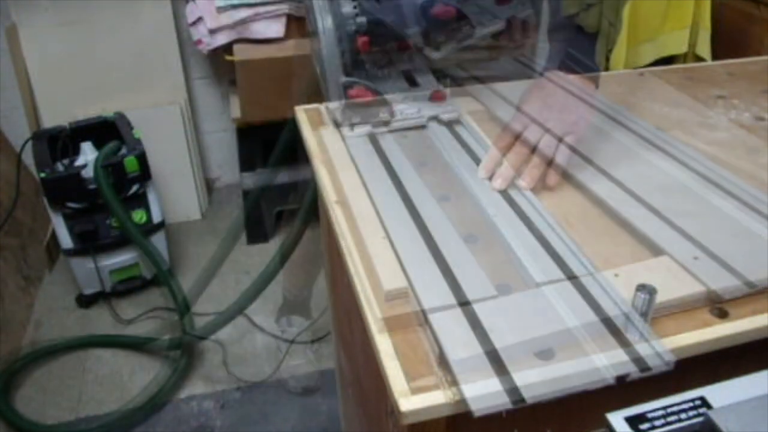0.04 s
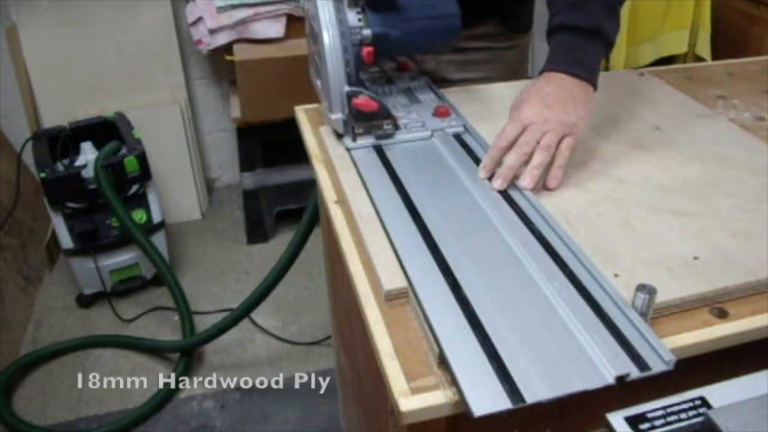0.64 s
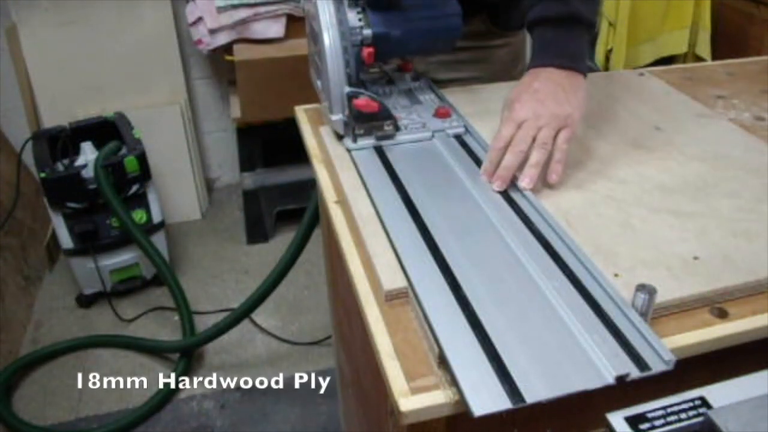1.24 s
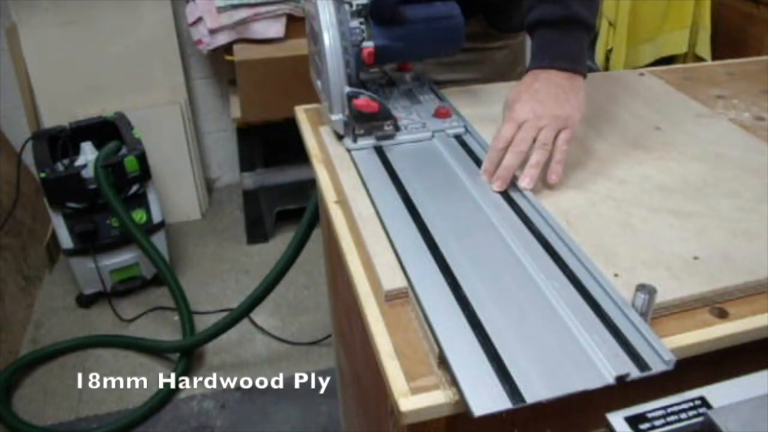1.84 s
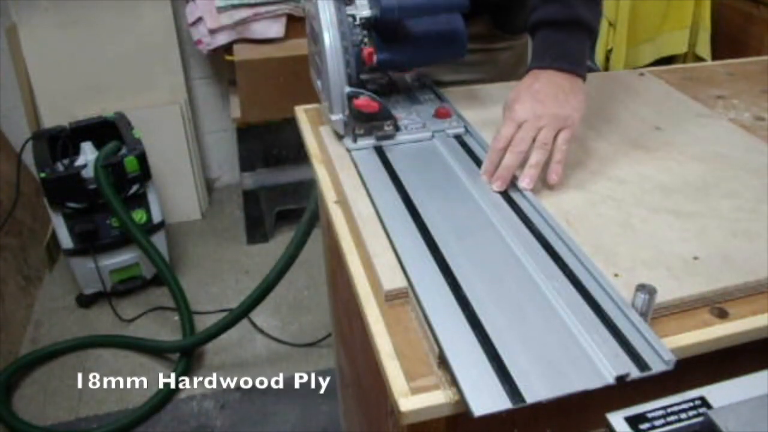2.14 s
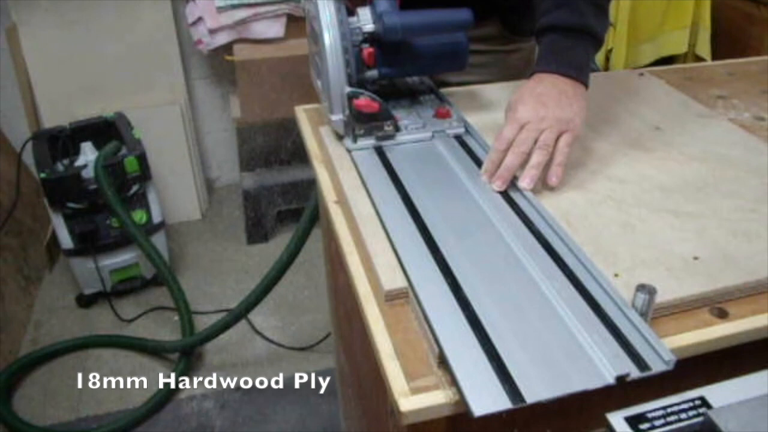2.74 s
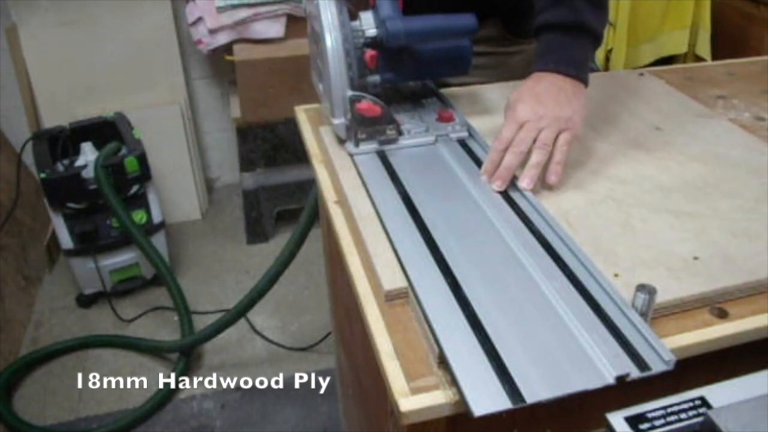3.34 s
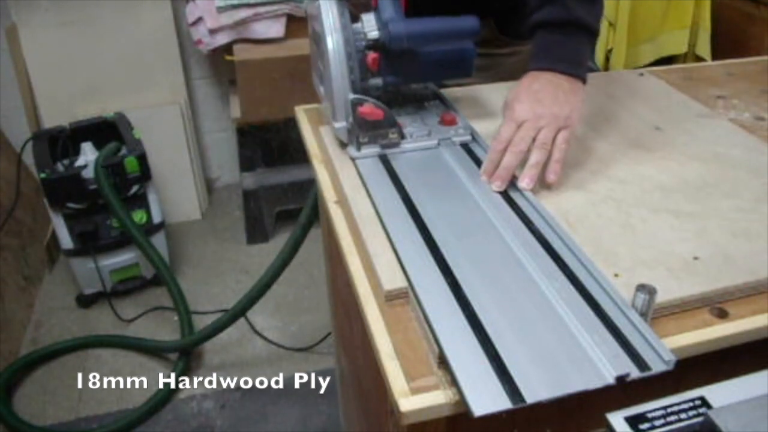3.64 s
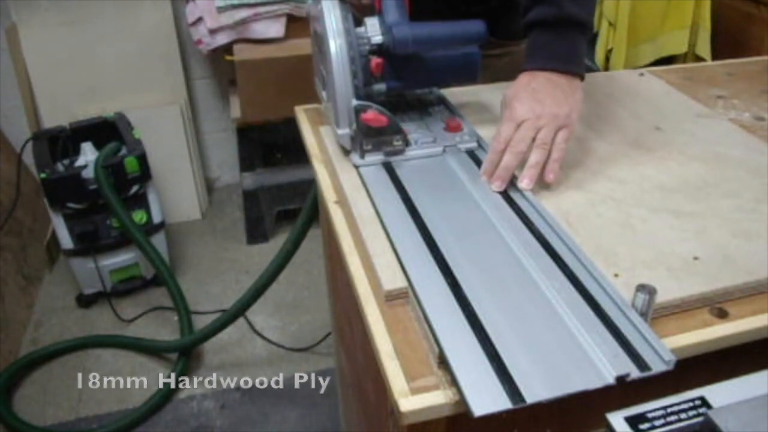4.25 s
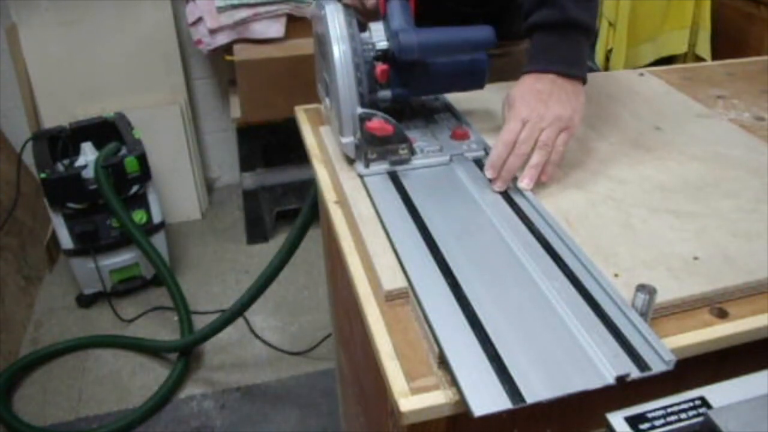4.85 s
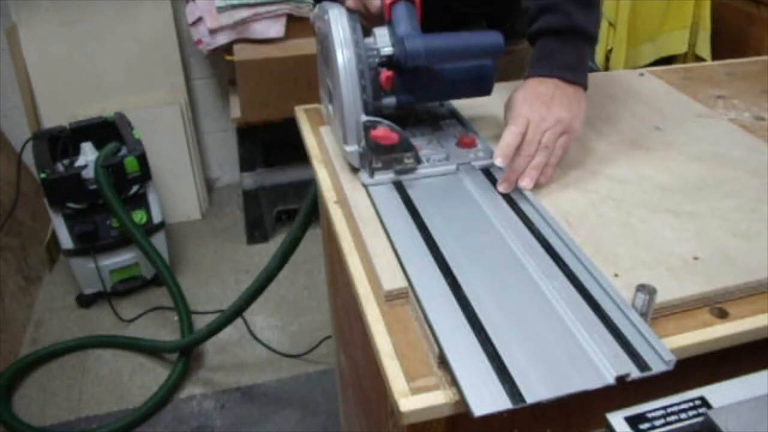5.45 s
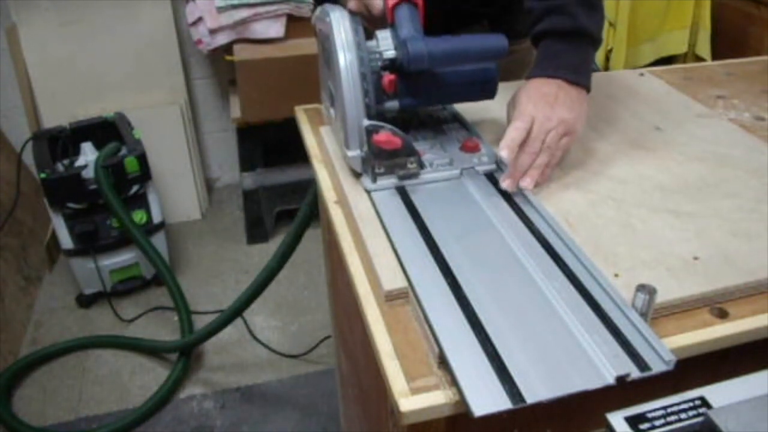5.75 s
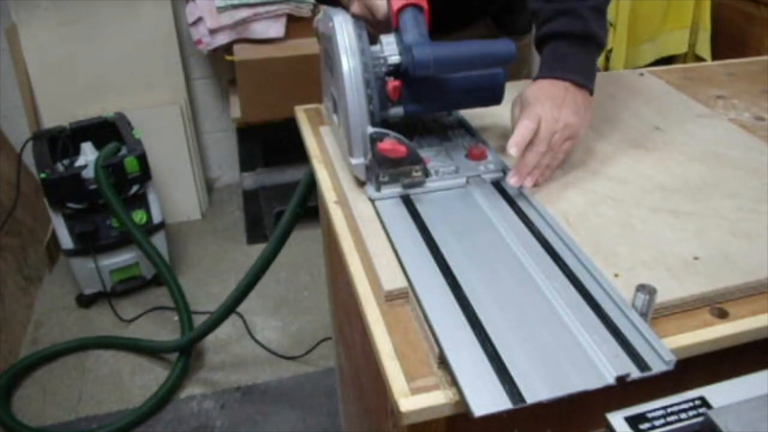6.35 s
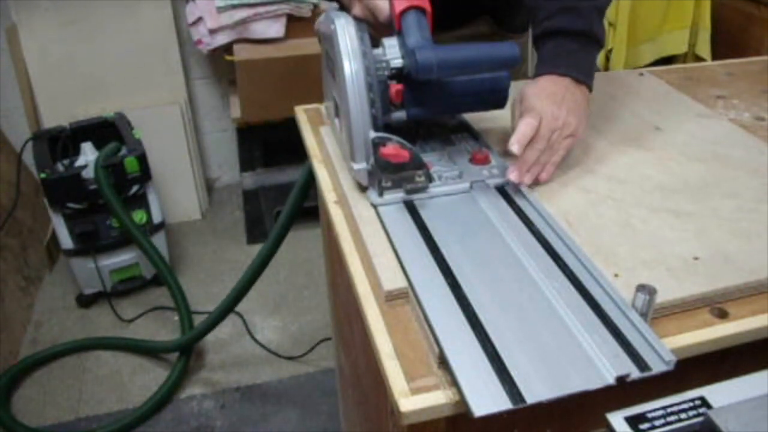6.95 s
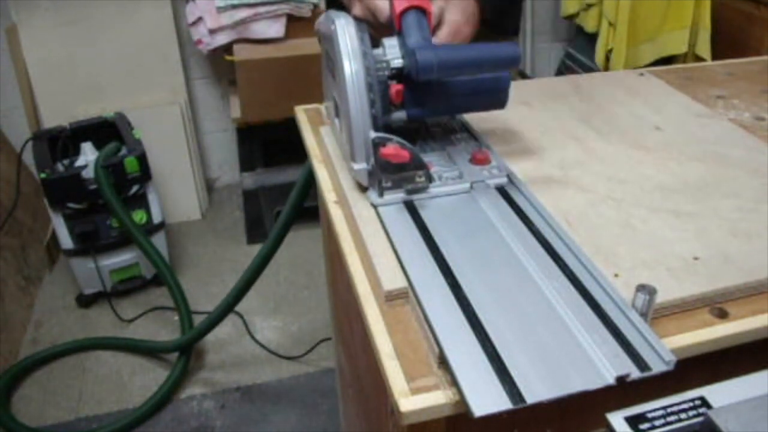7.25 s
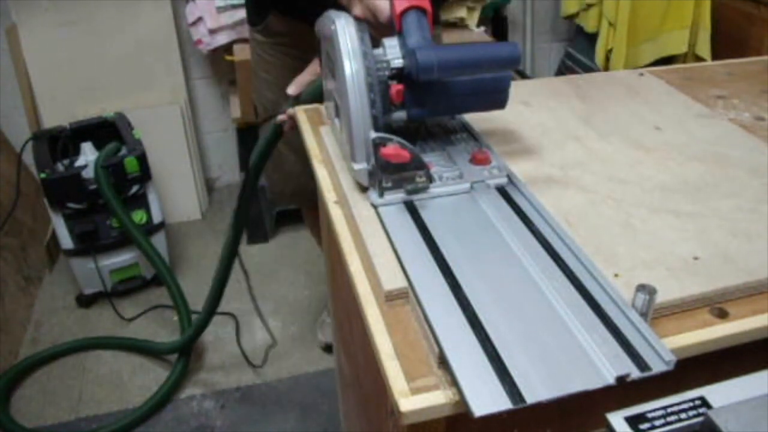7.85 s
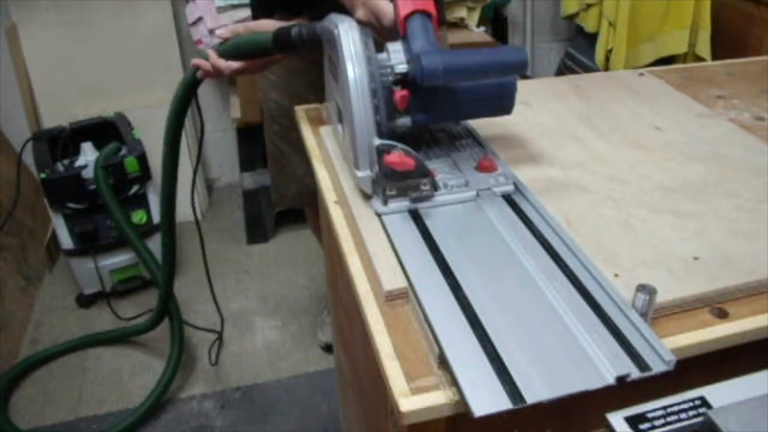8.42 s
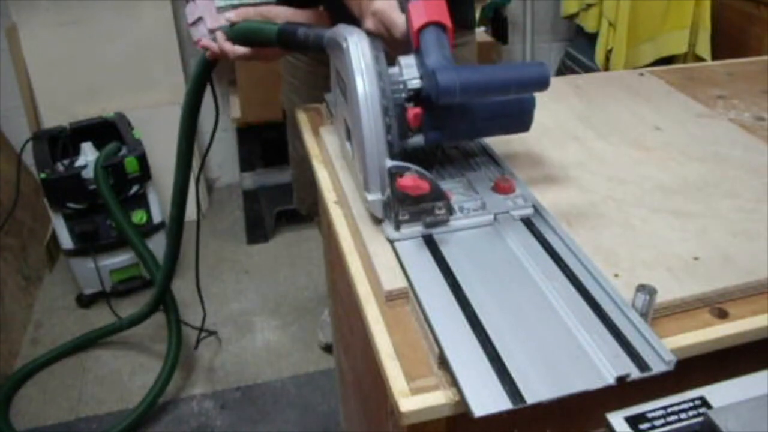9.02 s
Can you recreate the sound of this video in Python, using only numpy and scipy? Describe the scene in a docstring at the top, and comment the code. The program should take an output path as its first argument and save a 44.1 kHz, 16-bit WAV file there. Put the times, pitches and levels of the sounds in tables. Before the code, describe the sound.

A few light knocks, then a plunge saw starts and cuts plywood with a whine and brief squeals over a rushing dust extractor.

```python
"""A plunge saw cuts plywood in a workshop. Its teeth keep the blade ringing; now and then the blade
rubs in the kerf and squeals. The motor starts with a kick, runs up, and its whine sags under load.
Before the start, the saw knocks and slides lightly on its guide rail. A dust extractor rushes under
the cut. The machines overload a narrow-band recorder, which flattens them to one steady level."""
import sys
import numpy as np
from scipy import signal
from scipy.fft import rfft, irfft, next_fast_len
from scipy.io import wavfile
from scipy.ndimage import uniform_filter1d

SR = 44100
rng = np.random.default_rng(int(sys.argv[2]) if len(sys.argv) > 2 else 0)


def log_audio(samples):
    """Write samples as a 16-bit WAV file to the path given in sys.argv[1]."""
    # one column per channel
    frames = np.atleast_2d(samples).T
    # limit to full scale, then quantise
    limited = np.clip(frames, -1, 1)
    pcm = np.round(limited * 32767).astype(np.int16)
    wavfile.write(sys.argv[1], SR, pcm)


N = 400428
T = np.arange(N) / SR
START_S, RATED_HZ = 1.698, 460  # switch-on time, rated shaft speed

# Blade modes. Each row: pitch at rated speed in Hz, width in Hz, relative level in the cut in dB,
# shift in Hz per Hz of shaft speed, change when spinning free in dB.
BLADE_MODES = [(2968, 35, -44, -0.6, -16), (3432, 21.5, -44, 0.7, -2), (4616, 29, -44.5, 0.9, -8),
               (4665, 36, -44.5, 0.9, -7)]
# Saw body and rail under the cut. Each row: centre in Hz, width in Hz, relative level in dB.
BODY_MODES = [(980, 125, -53.5), (1888, 98, -47.5), (2059, 62, -51), (2700, 104, -47.5), (2888, 210, -47.5),
              (4070, 47, -57)]
# Rubs in the kerf. Each row: middle in seconds, length in seconds, pitch in Hz, relative level in dB.
KERF_RUBS = [(2.36, 0.17, 3434, -34), (2.847, .26, 4655, -34), (3.135, .22, 2965, -37.5),
             (3.7, 0.22, 3435, -35.5), (4.305, .2, 4634, -38), (5.65, 0.19, 2980, -38),
             (5.845, 0.12, 4620, -34), (6.803, 0.16, 2966, -34), (7.485, 0.11, 2968, -42),
             (7.715, 0.51, 4680, -34.5), (8.035, 0.22, 2966, -38), (8.25, 0.22, 4665, -39.5),
             (8.475, 0.24, 3467, -34.5), (8.704, 0.1, 3432, -31.5)]
# Speed the motor settles to as the feed varies. Each row: time in seconds, shaft speed in Hz.
SETTLED_SPEED = [(2.5, 473), (2.75, 462), (3.4, 464), (4.15, 458), (4.8, 447), (5.9, 441), (6.8, 461),
                 (7.05, 463), (7.35, 484), (7.9, 492), (8.4, 472), (8.65, 442), (8.9, 420), (9.08, 415)]
# Run-up, first touch, steady cut, hard push. Each row: time in seconds, load (0 free, 1 full cut).
MOTOR_LOAD = [(1.95, 0.85), (2.08, 0.16), (2.5, 0.022), (2.75, 0.36), (2.88, 1), (3.0, 0.25), (3.15, 0.93),
              (8.25, 1), (8.55, 2.04), (9.08, 1.7)]
# Multiples of the shaft speed: shaft hum, fan, fan octave, gear, gear half tone.
SHAFT_ORDERS = [2, 4, 8, 35 / 3, 35 / 6]
# Motor tones, one per order. Each row: relative level in dB, shaft speed where loudest in Hz,
# speed range in Hz, change per unit load in dB.
MOTOR_TONES = [(-55.5, 496, 12, 5.5), (-42.5, 449.4, 17, -10), (-35.5, 472, 13, -15),
               (-44.5, 300, 120, 2.5), (-56.5, 422, 40, 7)]
# Fan whine swells. Each row: middle in seconds, length in seconds, shaft order, rise in dB.
FAN_SWELLS = [(1.97, 0.29, 8, 14), (2.198, 0.17, 4, 8), (2.47, 0.14, 8, 5.5), (2.56, 0.13, 4, 5),
              (3.012, .12, 8, 5)]
# Housing resonances. Each row: centre in Hz, width in Hz, relative level in dB.
HOUSING_MODES = [(315, 29, -8), (701, 225, 0), (1024, 210, -3), (1520, 57, -1.5), (1918, 99, 1),
                 (2555, 1350, 3)]
# Knocks of saw on rail. Each row: start in seconds, relative level in dB, low-pass cutoff in Hz.
RAIL_KNOCKS = [(0.021, -48, 4000), (0.046, -63, 3500), (0.0976, -52, 3600), (0.147, -65, 3000),
               (0.234, -43.5, 1700), (0.287, -45, 2520), (0.298, -37, 2400), (0.388, -49, 3500),
               (0.419, -54, 1600), (0.462, -50, 3000), (0.478, -49, 1500), (0.536, -52.5, 2600),
               (0.581, -56.5, 1300), (0.898, -50.5, 990), (1.393, -68.5, 2000), (1.501, -70, 2000),
               (1.676, -65, 1790)]
# Rail on the bench. Each row: pitch in Hz, t60 in seconds, relative level in dB.
RAIL_MODES = [(589, 0.15, -6), (805, .07, -4.5), (943, 0.13, -8), (1190, 0.17, -12), (1520, 0.067, -7),
              (1745, 0.055, -1), (2045, 0.032, 1), (2580, 0.032, 0), (3910, 0.017, 6)]
# Pushes along the rail. Each row: start in seconds, hold in seconds, relative level in dB,
# fade t60 in seconds, hiss against scrape in dB.
BASE_PUSHES = [(0, 0.047, -62.5, 0.66, 6), (.1, 0.4, -72.5, 1.0, 0.5), (1.45, 0.054, -68, 0.23, -16)]
# Noise spectra. Each row: frequency in Hz, relative density in dB.
RUSH_SPECTRUM = [(20, -9.5), (100, -6.5), (450, -6.5), (750, -3), (1000, -3.5), (1500, -3), (2300, -1.5),
                 (2750, 2.5), (3500, 2.5), (4300, -1), (4900, 1), (6000, -6)]  # air and cutting teeth
CRACK_SPECTRUM = [(60, -26), (200, -9), (440, -5), (600, 4), (1000, 1), (2000, -1), (3000, -4), (5000, -7)]  # crack of a knock
SCRAPE_SPECTRUM = [(10, -15), (30, 1), (150, -6), (400, -4.5), (700, -2), (2200, -2), (3000, -16),
                   (5000, -13)]  # dull scrape of the base
HISS_SPECTRUM = [(20, 0), (80, 12.5), (250, -3), (1200, -9), (2300, 0), (5000, -4)]  # dry hiss of the base
ROOM_SPECTRUM = [(10, -25), (20, 0), (30, -8), (70, -20), (150, -17), (400, -22.5), (700, -22),
                 (1200, -23.5), (3400, -26.5), (5000, -28)]  # quiet workshop
# Recorder response before and after the overload. Each row: frequency in Hz, gain in dB.
INPUT_RESPONSE = [(20, 3.5), (4850, 0.5), (5050, -3), (5200, -12), (5400, -14), (5900, -60)]
OUTPUT_RESPONSE = [(20, 1), (4900, 0), (5400, -6), (7000, -6), (10500, -6.5), (13000, -9.5), (15700, -20)]


def blade(speed_hz, load, wander_db=1.2, body_db=-1, body_free_db=-5):
    """Teeth striking wood keep the blade's modes ringing; body and rail resonate more under load."""
    free = np.clip(1 - load, 0, 1)
    ring = 0
    for hz, width_hz, db, shift, free_db in BLADE_MODES:
        mode_hz = hz + shift * (speed_hz - RATED_HZ)  # waves with the spin rise, those against it fall
        ring += undb(db + free_db * free + wander_db * walk(5)) * resonance(mode_hz, width_hz)
    body = undb(body_db + body_free_db * free) * resonances(BODY_MODES)
    return np.minimum(speed_hz / RATED_HZ, 1) ** 6 * (ring + body)


def squeals(waver_hz=12):
    """Each rub in the kerf swells one blade mode into a nearly pure tone."""
    out = np.zeros(N)
    waver_cycles = np.cumsum(waver_hz * walk(60)) / SR
    for middle_s, length_s, hz, db in KERF_RUBS:
        out += undb(db) * arch(middle_s, length_s) * np.sin(2 * np.pi * (hz * T + waver_cycles))
    return out


def shaft_speed_hz(start_deficit=0.82, runup_s=0.152):
    """The motor closes in on its running speed, which sags and recovers with the feed."""
    runup = 1 - start_deficit * np.exp(-since(START_S) / runup_s)
    return np.interp(T, *np.transpose(SETTLED_SPEED)) * runup


def motor(speed_hz, load, wobble=0.002, load_wobble=0.0012, flutter_db=3):
    """Hum, fan and gear tones on one trembling shaft; load damps the fan and makes the gears sing."""
    tremble = (wobble + load_wobble * load) * walk(90)
    angle = 2 * np.pi * np.cumsum(speed_hz * (1 + tremble)) / SR
    tones = 0
    for order, (db, loudest_hz, range_hz, load_db) in zip(SHAFT_ORDERS, MOTOR_TONES):
        in_tune = 1 / np.hypot(1, (speed_hz - loudest_hz) / range_hz)
        swell_db = sum(rise_db * arch(middle_s, length_s)
                       for middle_s, length_s, fan_order, rise_db in FAN_SWELLS if fan_order == order)
        level_db = db + load_db * load + swell_db + flutter_db * walk(45)
        tones += in_tune * undb(level_db) * np.sin(order * angle)
    return room_echo(tones)


def starting_kick(level_db=-37.5, t60_s=2.6):
    """Starting torque shakes the housing into a fading rattle."""
    return unit(resonances(HOUSING_MODES)) * undb(level_db - 60 * since(START_S) / t60_s)


def extractor(level_db=-32, start_offset_db=-10, build_s=0.32, flicker_db=0.73):
    """Air and flying chips: a broad, slightly flickering rush that builds up and holds."""
    build_db = start_offset_db * np.exp(-since(START_S) / build_s)
    return undb(level_db + build_db + flicker_db * walk(20)) * noise(RUSH_SPECTRUM)


def knocks(crack_t60_s=0.026, ring_db=-7, tail_db=-14, tail_t60_s=0.27, contact_s=0.00065):
    """Saw meets rail: a short crack, the rail's modes and a room tail; softer contacts are duller."""
    out, grit = np.zeros(N), noise(CRACK_SPECTRUM)
    t = T[:SR // 2]
    attack = np.minimum(t / contact_s, 1)
    for start_s, db, cutoff_hz in RAIL_KNOCKS:
        start = int(start_s * SR)
        span = slice(start, start + len(t))
        weights = rng.uniform(0.6, 1.4, len(RAIL_MODES))  # vary with the contact point
        phases = rng.uniform(0, 2 * np.pi, len(RAIL_MODES))
        ring = sum(weight * undb(mode_db - 60 * t / t60_s) * np.sin(2 * np.pi * hz * t + phase)
                   for weight, phase, (hz, t60_s, mode_db) in zip(weights, phases, RAIL_MODES))
        burst = grit[span] * (undb(-60 * t / crack_t60_s) + undb(tail_db - 60 * t / tail_t60_s))
        lowpass = signal.butter(2, cutoff_hz, fs=SR)
        out[span] += undb(db) * signal.lfilter(*lowpass, (burst + undb(ring_db) * ring) * attack)
    return out


def sliding(catch_db=2.5, attack_s=0.0049):
    """The base rubs unevenly along the rail: each push sets in quickly, holds and fades."""
    out, scrape, hiss = np.zeros(N), noise(SCRAPE_SPECTRUM), noise(HISS_SPECTRUM)
    for start_s, hold_s, db, t60_s, hiss_db in BASE_PUSHES:
        attack = np.minimum(since(start_s) / attack_s, 1)
        push = attack * undb(db - 60 * since(start_s + hold_s) / t60_s)
        out += push * (scrape + undb(hiss_db) * hiss)
    return undb(catch_db * walk(70)) * out


def room_echo(x, wet_db=-5.5, t60_s=0.12, gap_s=0.004):
    """Direct sound plus the dense, short echo of a small room."""
    t = T[:SR // 3]
    echo = rng.standard_normal(len(t)) * undb(-60 * t / t60_s) * (t > gap_s)
    return x + undb(wet_db) * signal.fftconvolve(x, echo / np.linalg.norm(echo))[:N]


def undb(db):
    """Decibels to gain."""
    return 10 ** (db / 20)


def unit(x):
    """Scale to rms 1."""
    return x / np.sqrt(np.mean(x ** 2))


def since(start_s):
    """Seconds since start_s, 0 before it."""
    return np.maximum(T - start_s, 0)


def arch(middle_s, length_s):
    """Half-cosine rise and fall, 0 to 1 to 0."""
    return np.cos(np.pi * np.clip((T - middle_s) / length_s, -0.5, 0.5))


def walk(rate_hz):
    """Smooth random drift, rms 1."""
    hold = int(SR / rate_hz)
    steps = np.repeat(rng.standard_normal(N // hold + 1), hold)
    return unit(uniform_filter1d(uniform_filter1d(steps, hold), hold)[:N])


def colour(x, points):
    """Filter by a curve of (Hz, dB) points."""
    hz, db = np.transpose(points)
    size = next_fast_len(len(x) + 4096)
    bins_hz = np.maximum(np.fft.rfftfreq(size, 1 / SR), 1)
    gain = undb(np.interp(np.log(bins_hz), np.log(hz), db))
    return irfft(rfft(x, size) * gain, size)[:len(x)]


def noise(spectrum):
    """Coloured noise, rms 1."""
    return unit(colour(rng.standard_normal(N), spectrum))


def resonance(hz, width_hz):
    """Noise-driven resonance with steep skirts, rms 1; its centre may move."""
    drive = rng.standard_normal(N) + 1j * rng.standard_normal(N)
    envelope = signal.sosfilt(signal.butter(2, width_hz / 2, fs=SR, output="sos"), drive)
    carrier = np.exp(2j * np.pi * np.cumsum(hz * np.ones(N)) / SR)
    return unit(np.real(envelope * carrier))


def resonances(modes):
    """Sum of steady noise-driven resonances."""
    return sum(undb(db) * resonance(hz, width_hz) for hz, width_hz, db in modes)


def scene(machines_db=3.0, rise_s=0.0093, room_db=-76.5):
    """Handling in the quiet room, then saw and extractor switch on."""
    speed_hz = shaft_speed_hz()
    load = np.interp(T, *np.transpose(MOTOR_LOAD))
    running = np.minimum(since(START_S) / rise_s, 1)
    machines = motor(speed_hz, load) + blade(speed_hz, load) + squeals() + extractor() + starting_kick()
    machines *= undb(machines_db) * running
    return (machines + knocks() + sliding() + undb(room_db) * noise(ROOM_SPECTRUM))[None]


def record(dry, ceiling_db=-32, knee_hardness=12, mirror_db=-19, top_hz=15700):
    """A 5 kHz pass band, then an overloaded stage whose distortion fills the treble."""
    band = colour(dry[0], INPUT_RESPONSE)
    drive = np.abs(band / undb(ceiling_db))
    clipped = band / (1 + drive ** knee_hardness) ** (1 / knee_hardness)
    # overload adds faint mirror tones around SR / 4
    mirror = 2 * undb(mirror_db) * (band - clipped) * np.cos(np.pi / 2 * np.arange(N))
    lowpass = signal.ellip(12, 0.1, 70, top_hz, fs=SR, output="sos")
    return signal.sosfilt(lowpass, colour(clipped + mirror, OUTPUT_RESPONSE))[None]


dry = scene()
out = record(dry)
log_audio(out)
```